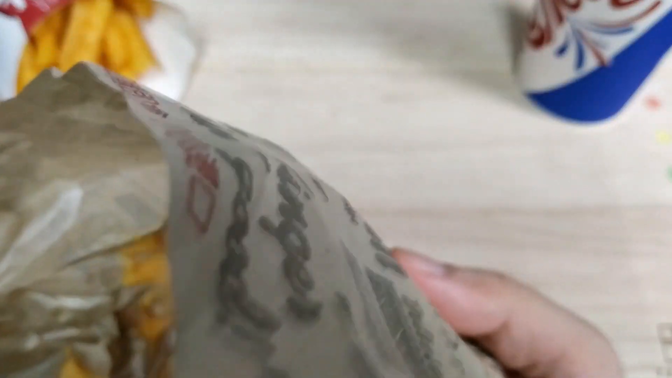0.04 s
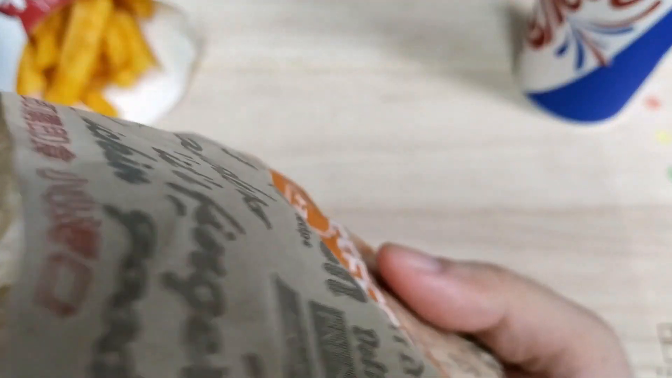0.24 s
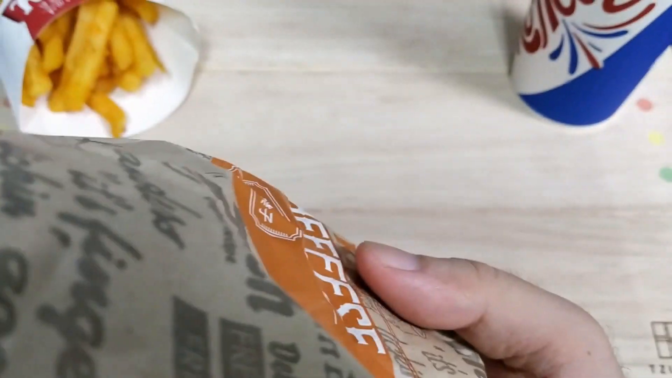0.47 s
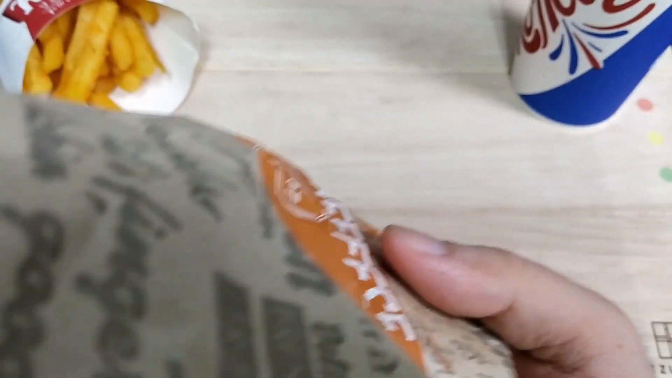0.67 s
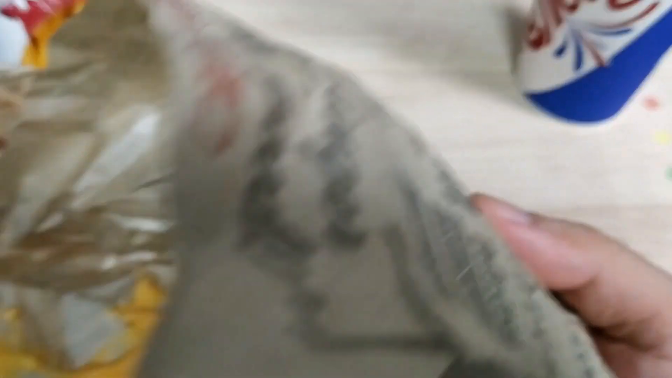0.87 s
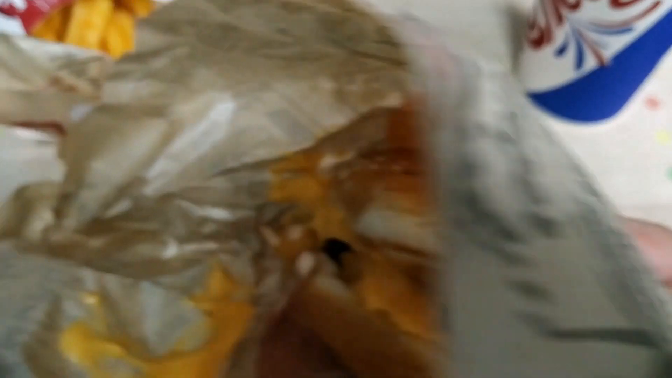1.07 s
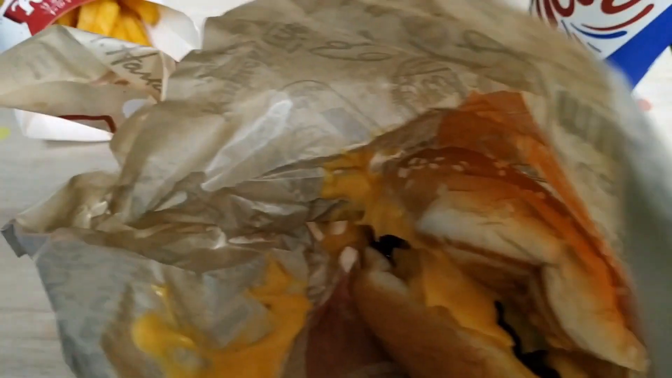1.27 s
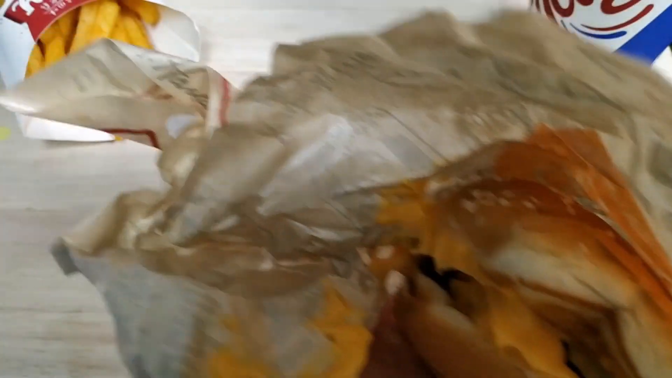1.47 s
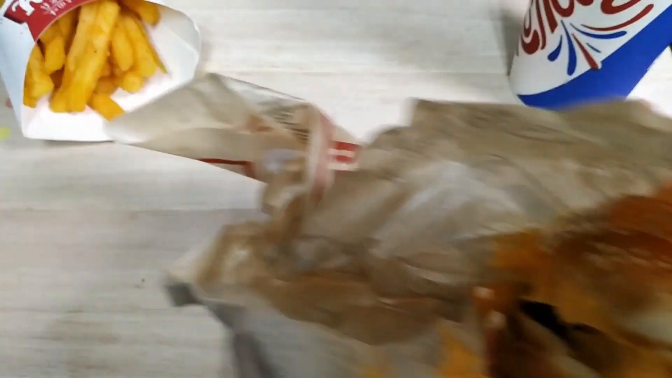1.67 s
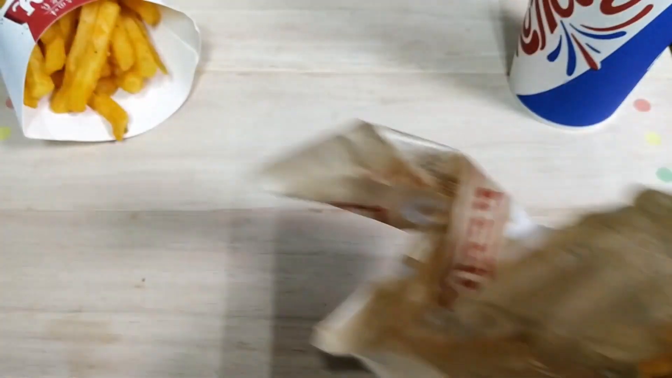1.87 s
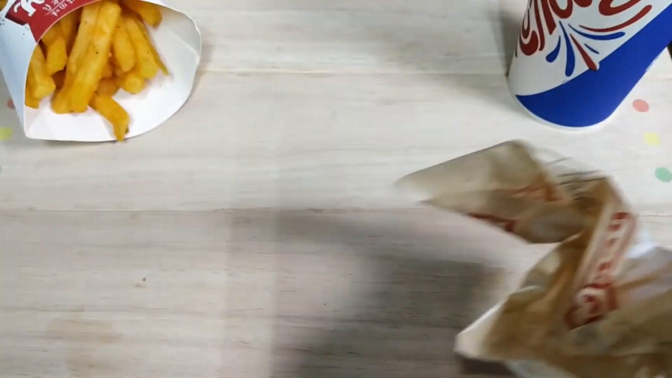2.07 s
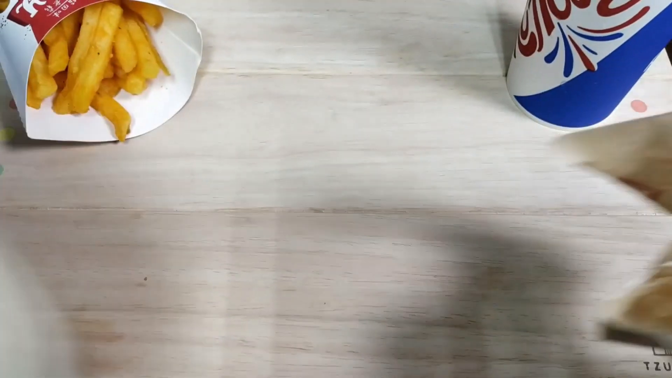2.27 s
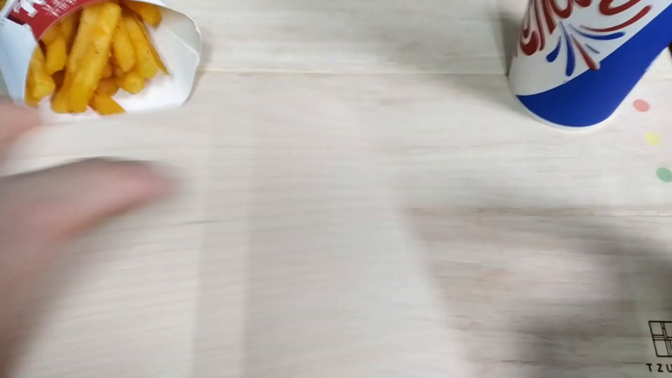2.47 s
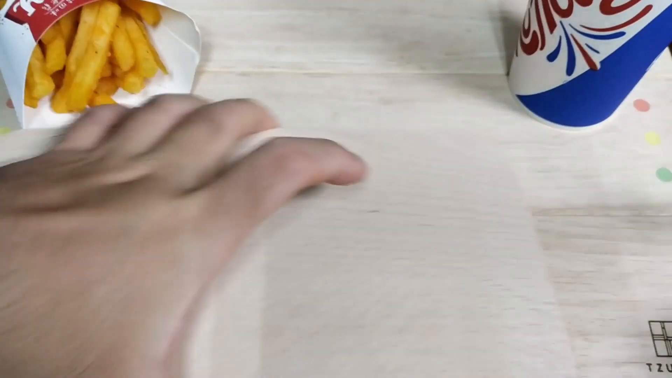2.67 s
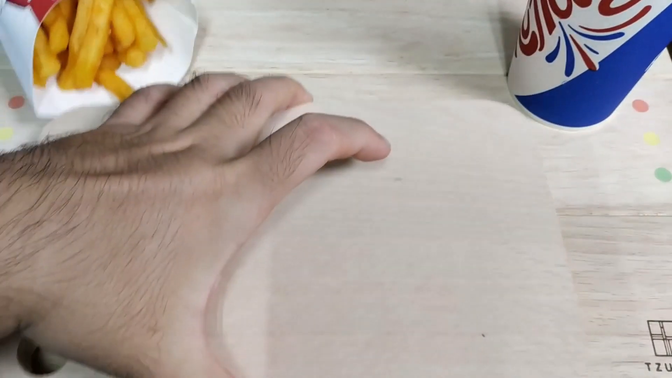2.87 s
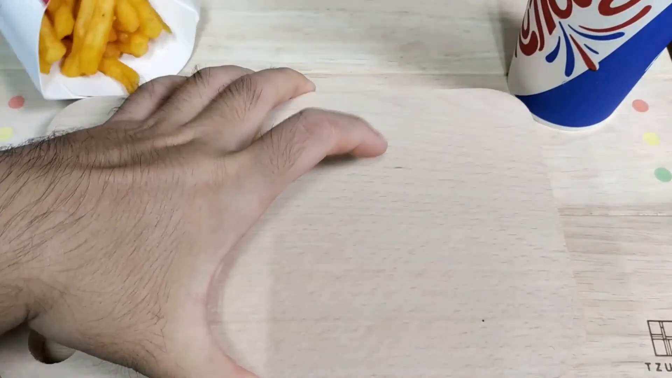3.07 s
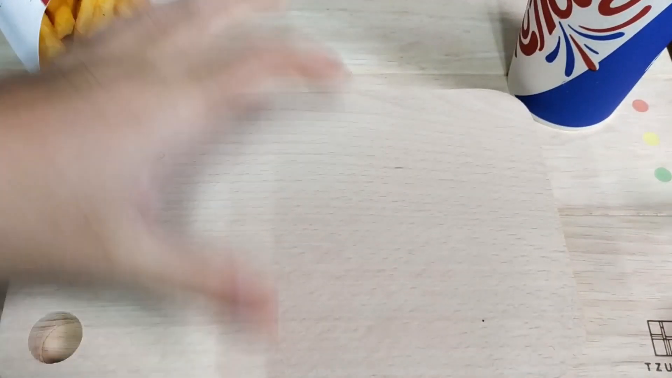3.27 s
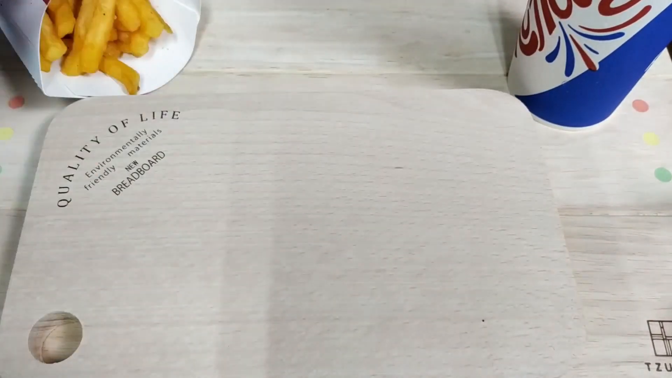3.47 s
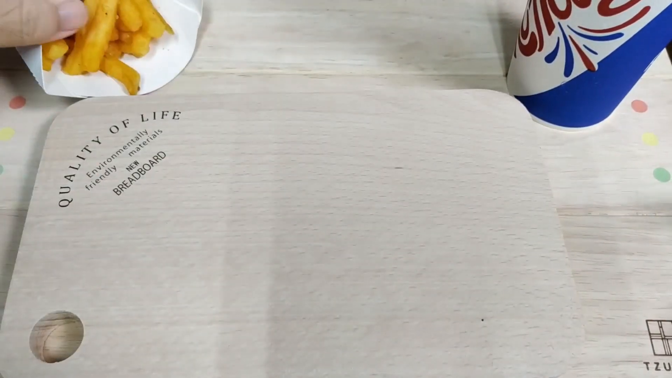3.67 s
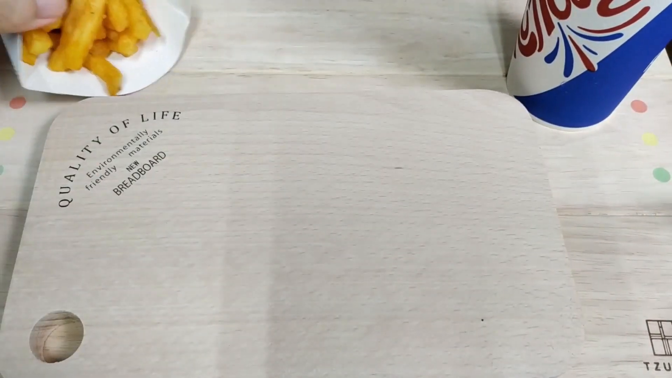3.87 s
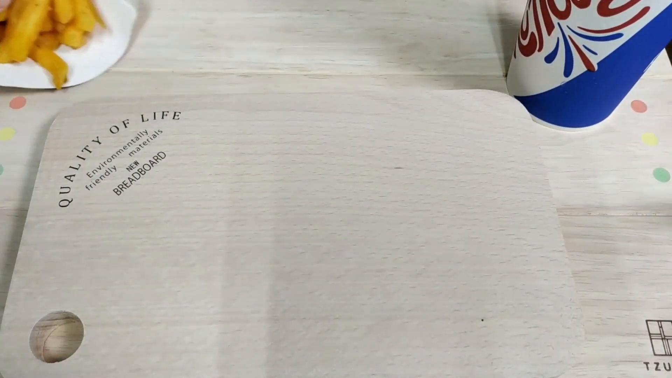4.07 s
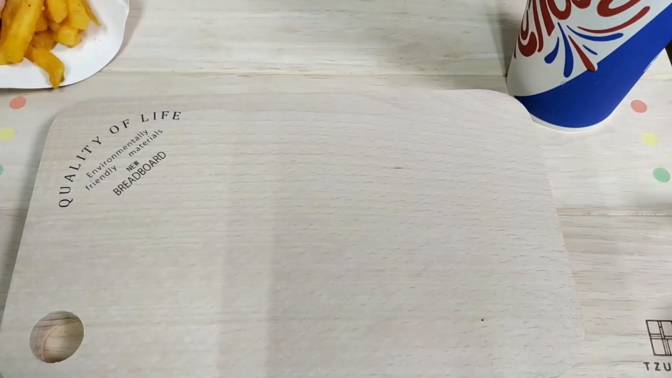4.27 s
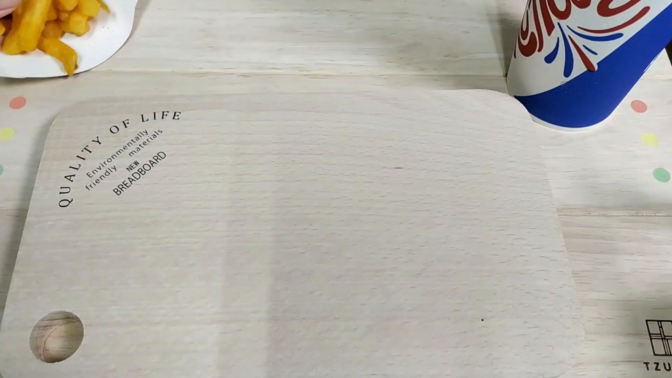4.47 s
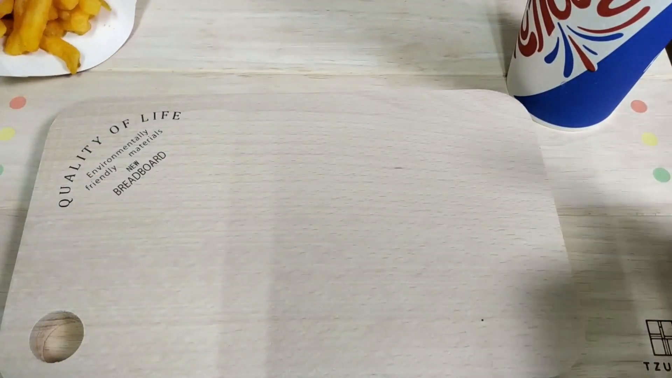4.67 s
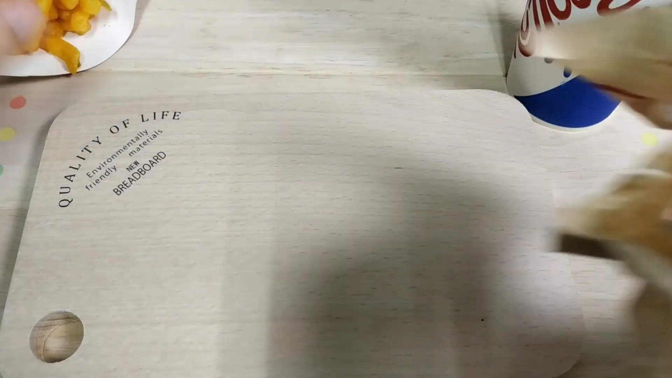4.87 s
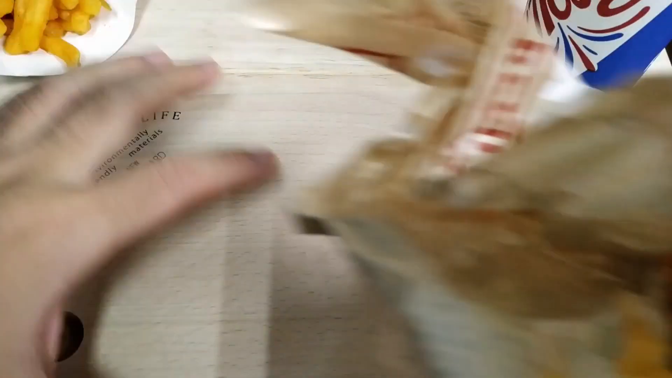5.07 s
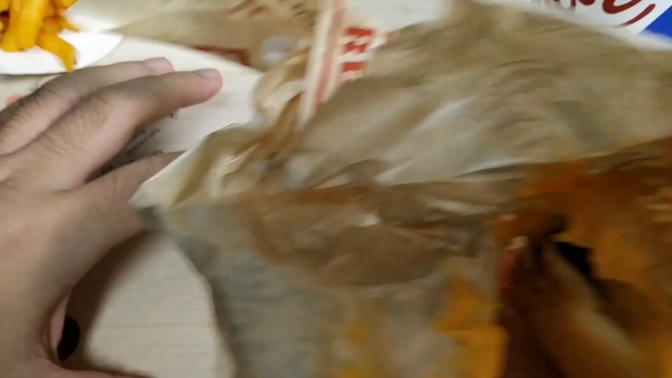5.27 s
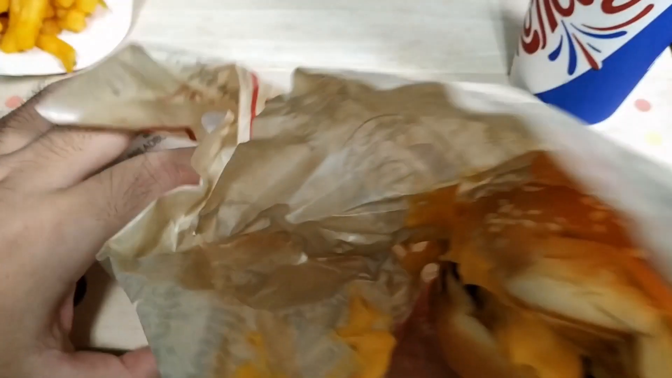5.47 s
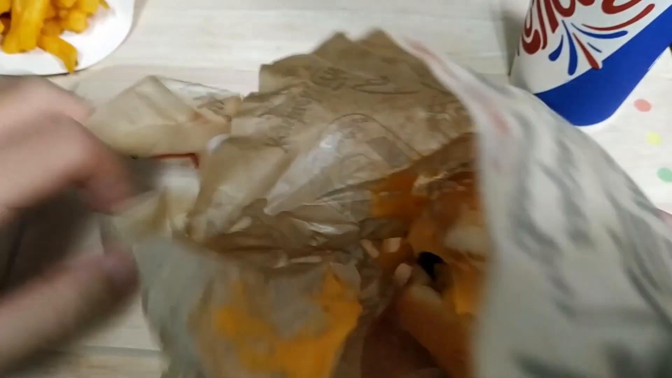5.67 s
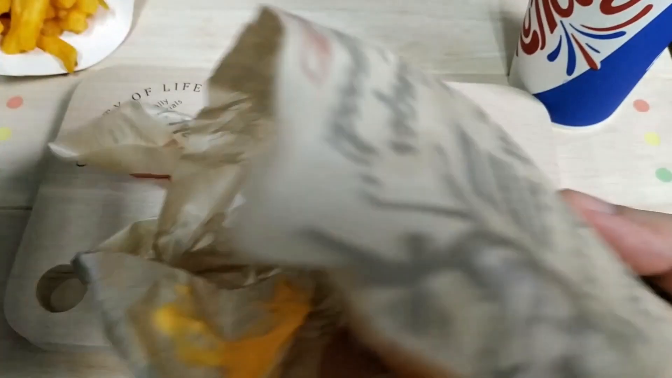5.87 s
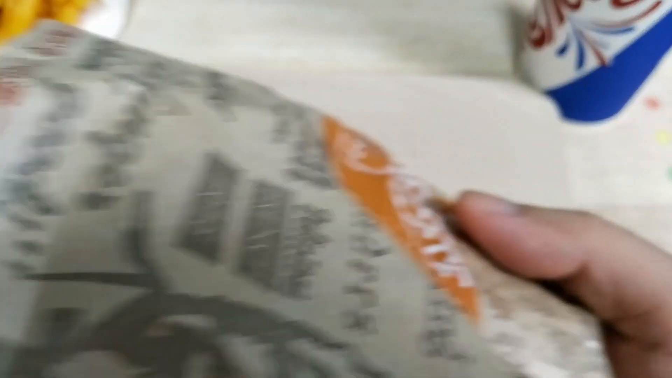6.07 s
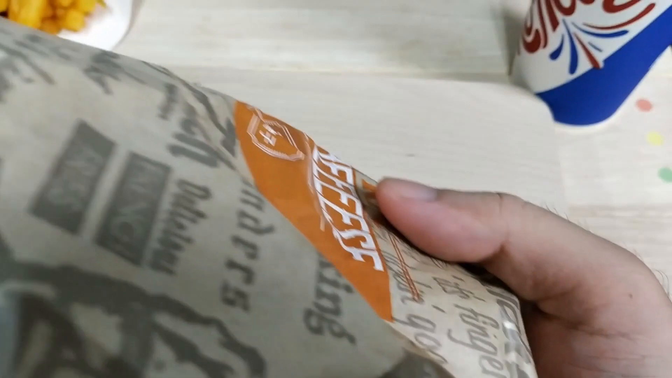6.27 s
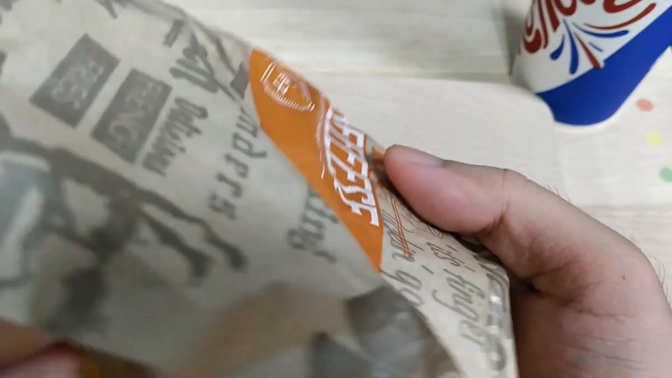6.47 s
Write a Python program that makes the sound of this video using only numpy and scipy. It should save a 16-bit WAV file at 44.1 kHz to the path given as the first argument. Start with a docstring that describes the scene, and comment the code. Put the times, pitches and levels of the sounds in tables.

```python
"""Over the rumble and hum of a quiet room, hands turn a paper food wrapper above a table, close to a pair
of microphones. Paper and skin brush in tiny slips; creases buckle, snap and ring the folds of the sheet;
now and then something thuds softly on the table. Near 2.8 s a wooden cutting board drops and bounces,
its modes ringing with each blow; near 5.5 s it is slid into place with a faint rattle."""
import sys
import numpy as np
from scipy import signal
from scipy.fft import rfft, irfft
from scipy.io import wavfile
from scipy.ndimage import uniform_filter1d

SR = 44100
rng = np.random.default_rng(int(sys.argv[2]) if len(sys.argv) > 2 else 0)


def waveform_to_disk(signal):
    """Save audio, clipped to [-1, 1], as 16-bit WAV at the path in sys.argv[1]."""
    frames = np.transpose(np.atleast_2d(signal))
    scaled = np.clip(frames, -1, 1) * 32767
    samples = np.round(scaled).astype(np.int16)
    wavfile.write(sys.argv[1], SR, samples)


N = 287973
TIME, FREQS = np.arange(N) / SR, np.fft.rfftfreq(N, 1 / SR)
SIDES = np.array([[1], [-1]])  # left and right microphone


def undb(db):
    """Decibels to gain."""
    return 10 ** (np.asarray(db) / 20)


def unit(x):
    """Scales to rms 1."""
    return x / np.sqrt(np.mean(x ** 2))


def along(table):
    """Spreads (frequency [Hz], value) points over FREQS on a log-frequency axis."""
    hz, values = np.transpose(table)
    return np.interp(np.log(FREQS + 1), np.log(hz), values)


def colour(x, table):
    """Filters by (frequency [Hz], gain [dB]) points, down to -60 dB an octave below the first."""
    edges = [(table[0][0] / 2, -60)] + list(table)
    return irfft(rfft(x) * undb(along(edges)), N)


def butter(x, order, hz, kind):
    """Butterworth low-pass or high-pass."""
    return signal.sosfilt(signal.butter(order, hz, kind, fs=SR, output="sos"), x)


def walk(rate_hz):
    """Random levels held 1 / rate_hz seconds and smoothed twice; spread near 1."""
    hold = int(SR / rate_hz)
    steps = np.repeat(rng.standard_normal(N // hold + 1), hold)
    return 1.3 * uniform_filter1d(uniform_filter1d(steps, hold), hold)[:N]


def grit(scatter_db):
    """Dense slips of rubbing fibres: one random size per sample, a few much larger."""
    return unit(rng.standard_normal(N) * undb(scatter_db * rng.exponential(size=N)))


def ring(x, hz, t60):
    """One damped mode driven by x."""
    pole = np.exp(2j * np.pi * hz / SR - np.log(1000) / (t60 * SR))
    return signal.lfilter([1], [1, -pole], x).imag


def swells(rows, swing_db=20):
    """Times and each row's power: up swing_db in its rise time, held, down swing_db in its fall time."""
    start, db, rise, hold, fall = np.array(rows)[:, :5].T[:, :, None]
    t = TIME[::16]
    slope = np.minimum(np.minimum((t - start) / rise, (start + hold - t) / fall), 0)
    return t, undb(2 * np.maximum(db + swing_db * slope, -200))


def place(out, start, x, pan_db, lag_ms_per_db=0.04):
    """Adds a short sound, louder and sooner at the nearer microphone."""
    for channel, side in enumerate((1, -1)):
        i = int((start - side * pan_db * lag_ms_per_db / 2000) * SR)
        n = min(len(x), N - i)
        out[channel, i:i + n] += x[:n] * undb(side * pan_db / 2)


def room_tone():
    """Quiet, gently wavering noise: alike at both microphones in the bass, unrelated in the treble."""
    # spectrum of the room's noise: (frequency [Hz], relative level [dB])
    spectrum = [(36, -30), (56, -2), (77, -17.5), (117, -8), (209, -16.5), (246, -17), (333, -17),
                (375, -17), (612, -22.5), (889, -22), (2610, -32.5), (3370, -36.5), (15000, -43),
                (16500, -56.5)]
    # likeness of left and right: (frequency [Hz], correlation [-1 to 1])
    likeness = [(60, 0.99), (130, 0.77), (290, 0.84), (640, 0.2), (1410, -0.2), (3100, 0.043),
                (6820, -0.11), (15000, 0.17)]
    alike = np.clip(along(likeness), -.9, .99)
    mid, side = (rfft(colour(rng.standard_normal(N), spectrum)) for _ in range(2))
    noise = irfft(np.sqrt(1 + alike) * mid + np.sqrt(1 - alike) * side * SIDES, N)
    return unit(noise) * undb(-53 + 0.7 * walk(rate_hz=2.55))


def rumble(centre_hz=49.5, half_width_hz=12):
    """A narrow band of deep noise that swells and sinks, nearly the same at both microphones."""
    # course of the rumble: (time [s], level [dB])
    levels = [(0.0, -51.5), (1.6, -54), (3.2, -56.5), (3.65, -50.5), (4.9, -55), (5.4, -48), (6.53, -50)]
    band = 1 / (1 + ((FREQS - centre_hz) / half_width_hz) ** 4)
    mid, side = irfft(rfft(rng.standard_normal((2, N))) * band, N)
    return unit(mid + 0.21 * side * SIDES) * undb(np.interp(TIME, *np.transpose(levels)))


def hum():
    """One low tone in the centre that comes and goes, its pitch wavering."""
    # course of the hum: (time [s], level [dB], pitch [Hz])
    course = [(1.2, -78, 154.8), (1.574, -51.5, 152.2), (1.7, -66, 147), (1.85, -57.5, 151.5),
              (2.3, -65.5, 149), (2.45, -80, 147), (3.0, -85, 147), (3.06, -50, 147.5),
              (3.54, -55.5, 146.3), (3.65, -72.5, 148.4), (4.23, -57.5, 153.8), (4.62, -60, 156.3),
              (4.8, -91, 156)]
    times, *columns = np.transpose(course)
    db, hz = (np.interp(TIME, times, column) for column in columns)
    return np.sqrt(2) * undb(db) * np.sin(2 * np.pi * np.cumsum(hz) / SR)


def brushing():
    """Paper and skin slip over a wide patch, so the close microphones hear them only partly alike."""
    # strokes of paper and skin: (time at full level [s], level [dB], rise [s], hold [s], fall [s],
    # body minus hiss [dB], left minus right [dB])
    strokes = [(0.023, -51.5, 0.13, .02, .03, -7, -3), (0.056, -40, 0.022, 0.023, .005, -6.5, -7),
               (0.092, -38, .006, .007, .006, -9, -4.5), (0.105, -38, .004, .004, .03, -6, -4),
               (0.16, -55.5, 0.058, .05, 0.15, -3, -1), (0.872, -46, 0.011, .002, 0.017, -21, -10),
               (0.9, -63, .02, .01, 0.13, -10, 3), (2.033, -63.5, 0.028, 0.055, .05, -9, -4),
               (2.456, -54, .012, 0.041, 0.17, -9, -5), (2.82, -40.5, 0.046, .01, 0.19, 4, -2),
               (2.99, -45.5, 0.24, 0.012, 0.14, -1.5, -1), (3.26, -60, 0.26, 0.0044, .06, -6.5, -4),
               (3.807, -53.5, .025, .005, 0.094, -7.5, -4), (4.06, -53, .2, 0.078, 0.14, -9, -2.5),
               (4.495, -54.5, 0.097, 0.038, 0.071, -7, -4), (5.07, -62.5, 0.5, 0.056, 0.39, -3, -6.5),
               (5.183, -42.5, 0.0081, 0.0018, 0.023, -10, 10), (5.278, -41.5, 0.071, .002, 0.025, -7.5, 5),
               (5.308, -38, 0.0047, 0.0022, 0.021, -4, 4), (5.476, -50, 0.08, 0.042, 0.16, 5.5, -3),
               (5.561, -44, 0.17, .002, 0.056, -4, -2), (5.592, -51.5, .03, .02, 0.38, -8.5, -3.5),
               (5.767, -42.5, 0.024, .03, .03, -7.5, -5), (5.821, -35.5, .07, .002, 0.026, -2.5, -2.5),
               (5.835, -49.5, .02, .005, 0.091, -6, 3), (6.032, -44.5, 0.19, .005, 0.17, -5.5, -1.5),
               (6.159, -46, 0.32, 0.1, 0.16, -7, -3.5), (6.354, -58.5, .1, .2, 0.11, -6.5, -3)]
    # spectra of the rubbing's hiss and body: (frequency [Hz], relative level [dB])
    hiss_colour = [(2500, -23), (3500, -1.5), (5500, -0.5), (8000, 6), (10500, 4.5), (13000, 3),
                   (16000, -7)]
    body_colour = [(300, 1), (700, -4.5), (1200, -5.0), (2500, -5.5), (3500, -10), (6000, -23.5)]
    t, power = swells(strokes)
    total = power.sum(axis=0)
    db = np.interp(TIME, t, 10 * np.log10(total))
    # where strokes overlap, the louder one sets colour and direction
    blend = np.array(strokes)[:, 5:].T @ power / total
    body_db, pan_db = (np.interp(TIME, t, column) for column in blend)
    shared = grit(scatter_db=2.0)
    flutter_db = 1.6 * walk(rate_hz=110)
    drift = walk(rate_hz=25)  # the colour wanders as the contact moves
    # firmer rubbing has more body and a duller top
    dull = np.clip(0.075 * (body_db + 12.5) + .15 * drift, 0, .85)
    top = signal.butter(2, 8500, "high", fs=SR, output="sos")
    out = []
    for side in (1, -1):
        slips = 0.29 * shared + 1.22 * grit(scatter_db=1.43)
        hiss = unit(colour(slips, hiss_colour))
        hiss -= dull * signal.sosfiltfilt(top, hiss)
        body = undb(body_db + 1.65 * drift) * unit(colour(slips, body_colour))
        out.append(undb(db + flutter_db + side * pan_db / 2) * (hiss + body))
    return np.array(out)


def snaps(peak_s=.0012, rattle_t60_s=0.024, rattle_share=0.47):
    """A crease buckles: a millisecond crack and a weaker rattle, heard directly and ringing two folds."""
    # ticks of creases and of the board's edge: (time [s], peak [dB], low ring [Hz], high ring [Hz],
    # high minus low [dB], left minus right [dB])
    ticks = [(0.0506, -18, 4930, 14400, 17, 4.5), (0.0644, -25, 3170, 6670, 17, 2),
             (0.0747, -18, 4500, 10000, -3, -6.5), (0.0884, -27, 3270, 9140, 1, -10),
             (0.0942, -24, 4030, 6470, 9, -8.5), (0.1059, -24, 1160, 8540, 7, -1),
             (0.163, -16.5, 2770, 5470, 7.5, -6.5), (0.2475, -29, 1660, 2850, 0, -0.5),
             (0.6481, -17.5, 3480, 5980, 1.5, -5.5), (0.8156, -25.5, 3330, 8600, 4, -4.5),
             (0.8596, -27, 4050, 8560, 27, -8.5), (0.8729, -25, 3550, 8100, 7, -5.5),
             (2.0717, -38, 1660, 9600, 16, -0.5), (2.2578, -48, 1440, 8590, 4, 0),
             (2.4401, -9, 8300, 13400, 6, 5), (2.4514, -38, 4170, 8000, 12, -1),
             (2.7672, -13, 1670, 8100, -22, 3.5), (2.8138, -20, 1670, 8050, -18, 0),
             (2.8532, -24, 1750, 8800, -3, 5.5), (2.9947, -23, 1700, 9100, 10, -0.5),
             (3.245, -42, 2170, 6770, -21, 10), (3.8062, -48, 3110, 8500, 5, -4),
             (5.182, -35, 2040, 8800, 2, 14.5), (5.2397, -38, 3970, 7600, 8, 7),
             (5.2723, -26.5, 4500, 9100, 23, 7.5), (5.289, -40, 2430, 12000, -6, 10),
             (5.3083, -22, 2500, 12300, 9, 9.5), (5.3156, -27, 1700, 10800, -7, 7),
             (5.5593, -23.5, 1940, 9000, 23, -0.5), (5.7094, -23, 2650, 8500, 14, -7.5),
             (5.7728, -32, 1430, 8500, 11, -17), (5.8104, -26, 1500, 7650, -6, -4),
             (5.8211, -21.5, 1500, 8540, -5, -5), (5.8809, -29.5, 1160, 6400, 5, -2),
             (6.4863, -44, 4700, 7400, 6, -7)]
    out, t = np.zeros((2, N)), np.arange(2500) / SR
    buckle = np.exp(-np.abs(t - peak_s) / np.where(t < peak_s, .00025, .0005))  # fast in, slower out
    rattle = rattle_share * (t > peak_s) * undb(-60 * t / rattle_t60_s)
    for start, db, low_hz, high_hz, high_db, pan_db in ticks:
        crack = np.sign(rng.standard_normal(len(t))) * (buckle + rattle)
        low_fold = unit(ring(crack, low_hz, t60=13 / low_hz))
        high_fold = undb(high_db) * unit(ring(crack, high_hz, t60=12 / high_hz))
        snap = unit(low_fold + high_fold) + undb(-1 + min(high_db, 0) / 2) * unit(crack)
        # a fold radiates little below its low ring or far above its high ring
        snap = butter(snap, 2, .5 * low_hz, "high")
        snap = butter(snap, 1, min(1.8 * high_hz, .45 * SR), "low")
        place(out, start, snap * undb(db) / np.abs(snap).max(), pan_db)
    return out


def thuds():
    """Hand, food or board meets the table softly: two damped low tones, midway between the microphones."""
    # soft landings: (time [s], level [dB], pitch [Hz], t60 [s])
    landings = [(0.074, -47, 330, 0.046), (0.105, -43.5, 101.3, 0.22), (2.442, -32, 231, 0.017),
                (2.999, -25, 150, 0.04), (3.082, -31, 200, 0.025), (5.191, -35, 121, 0.044),
                (5.24, -45.5, 567, 0.046), (5.275, -41, 348, 0.06), (5.311, -32, 202, 0.085),
                (5.323, -36, 166, 0.077)]
    out, t = np.zeros((2, N)), np.arange(8000) / SR
    for start, db, hz, t60 in landings:
        tones = np.sin(2 * np.pi * hz * t) + 0.55 * np.sin(2 * np.pi * 1.88 * hz * t)
        place(out, start, tones * undb(db - 60 * t / t60), pan_db=0)
    return out


def cutting_board(left_lag_ms=0.18):
    """Half-sine blows and dragging grit ring the wood; each mode faces the microphones its own way."""
    # blows on the board: (time [s], impulse [dB], contact time [ms])
    blows = [(2.744, -57, 0.18), (2.7676, -14.5, 0.1), (2.8046, -19, 0.48), (2.8077, -34, 1.2),
             (2.827, -21, 2.5), (2.997, -23, 2.4), (3.031, -28, 1.5), (3.04, -50, 2.6), (3.075, -47, 0.63),
             (3.084, -26.5, 2.44), (3.807, -53, 0.29)]
    # drags over the table: (time at full force [s], force [dB], rise [s], hold [s], fall [s])
    drags = [(2.82, -72, 0.0084, .01, 0.14), (2.992, -81.5, 0.051, .003, 0.076),
             (5.43, -89, 0.017, 0.046, .1), (5.52, -84, 0.094, 0.046, 0.026)]
    # modes of the board: (frequency [Hz], gain [dB], t60 [s], left minus right [dB])
    modes = [(97, -13.5, 0.47, -1.5), (120, -6.5, 0.33, -1), (212, -10, 0.13, -0.5), (257, -21.5, 0.6, -3),
             (280, -13, 0.19, 0.5), (380, -23, 0.2, -11), (515, 1.5, 0.074, 2), (557, -9.5, 0.11, -15),
             (600, -12.5, 0.14, -5), (763, -14, 0.05, -8), (783, -3, 0.041, 0), (916, 8, .014, 0.5),
             (1070, -0.5, 0.039, -3), (1186, -6, 0.096, -3), (1213, -11, 0.24, -5), (1230, 7.5, 0.011, 0.5),
             (1573, -4.5, 0.022, 21.5), (1800, 5, 0.016, -1.5), (2420, -2.5, 0.044, 6.5),
             (2650, 4.5, 0.011, 2), (3160, -5, 0.011, -12.5), (3440, -4, 0.021, 4.5)]
    force = np.zeros(N)
    for start, db, contact_ms in blows:
        width = max(int(contact_ms * SR / 1000), 3) + 2
        push = np.sin(np.pi * np.linspace(0, 1, width))
        i = int(start * SR)
        force[i:i + width] += undb(db) * push / push.sum()
    slips = grit(scatter_db=2.5) * undb(0.84 * walk(rate_hz=80))
    # a light drag favours two middle modes
    rattle = unit(unit(ring(slips, hz=564, t60=0.0074)) + 1.55 * unit(ring(slips, hz=1065, t60=0.013)))
    t, power = swells(drags)
    force += rattle * np.interp(TIME, t, np.sqrt(power.sum(axis=0)))
    out = np.zeros((2, N))
    for k, (hz, db, t60, pan_db) in enumerate(modes):
        # neighbouring modes radiate in opposite sign, so a free board is weak below its first mode
        out += (-1) ** k * ring(force, hz, t60) * undb(db + SIDES * pan_db / 2)
    out[0] = np.interp(TIME - left_lag_ms / 1000, TIME, out[0])
    return butter(out, 2, 80, "high")


def reflections(near, t60_s=0.36, treble_t60_s=0.22, level_db=-10):
    """The room answers with its own tail of decaying noise at each microphone; treble dies sooner."""
    t = np.arange(int(.7 * SR)) / SR
    onset = np.clip(t / 0.0062 - .25, 0, 1)
    noise = rng.standard_normal((2, len(t))) * onset * np.sqrt(2 * np.log(1000) / t60_s / SR)
    low = butter(noise, 1, 2500, "low")
    tail = low * undb(-60 * t / t60_s) + (noise - low) * undb(-60 * t / treble_t60_s)
    return undb(level_db) * signal.fftconvolve(near, tail, axes=1)[:, :N]


def scene():
    """Wrapper and board close to the microphones, the quiet room behind them."""
    near = brushing() + snaps() + thuds() + cutting_board()
    return near + reflections(near) + room_tone() + rumble() + hum()


def record(dry):
    """The recorder cuts the treble steeply above 16.4 kHz."""
    return signal.sosfilt(signal.ellip(10, .2, 70, 16400, fs=SR, output="sos"), dry)


dry = scene()
out = record(dry)
waveform_to_disk(out)
```